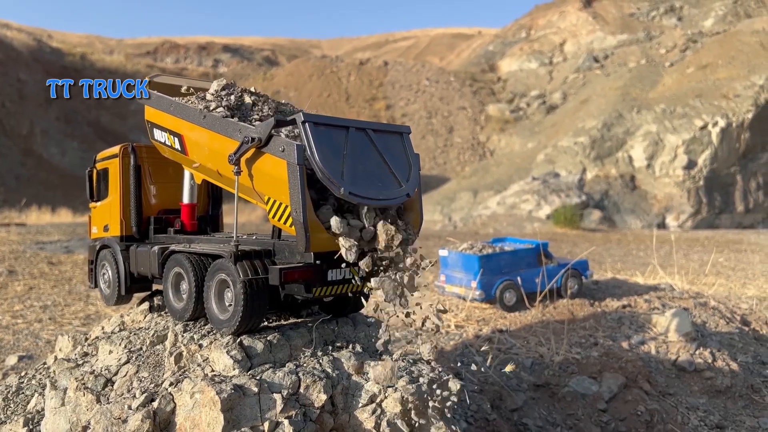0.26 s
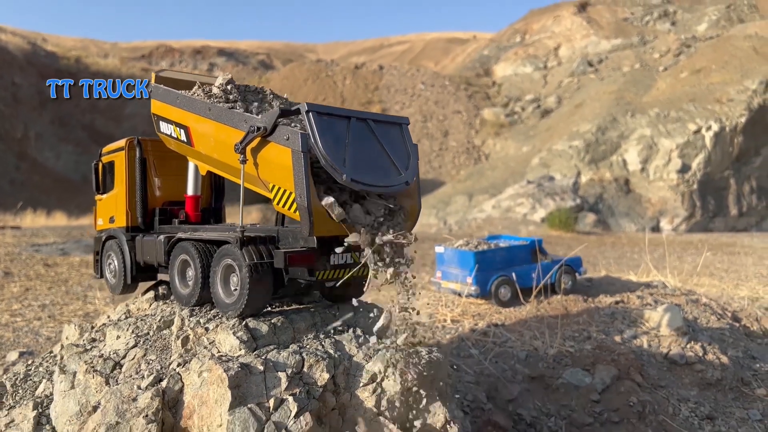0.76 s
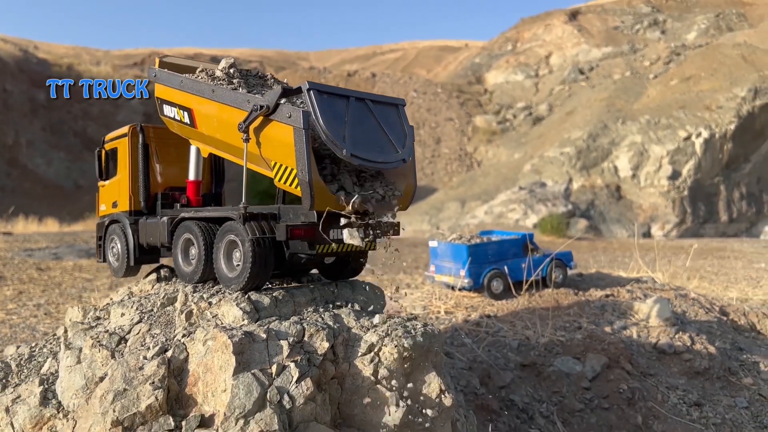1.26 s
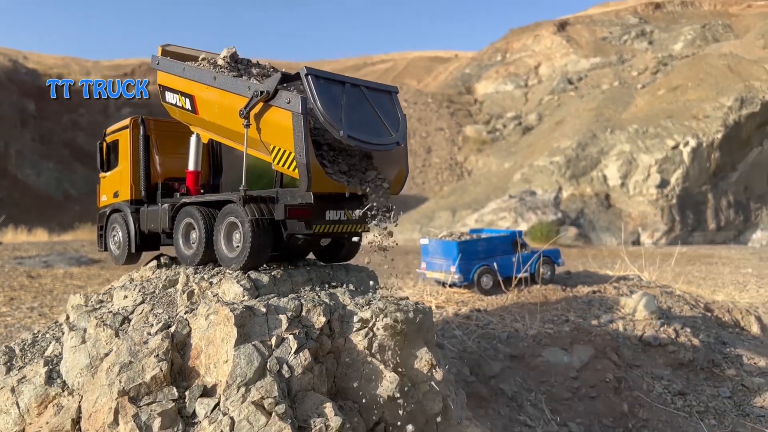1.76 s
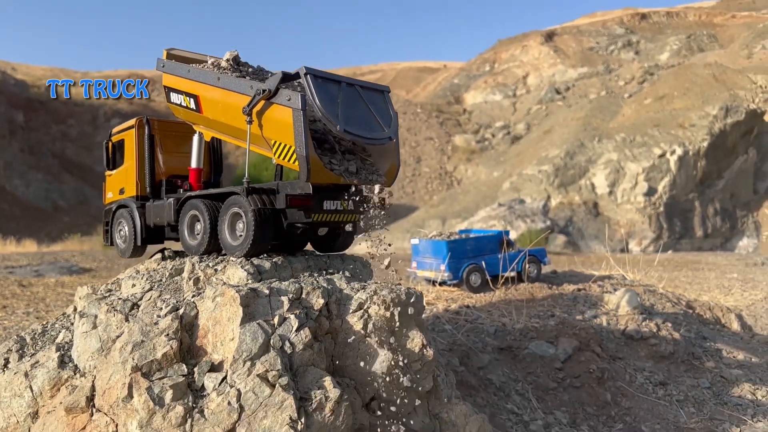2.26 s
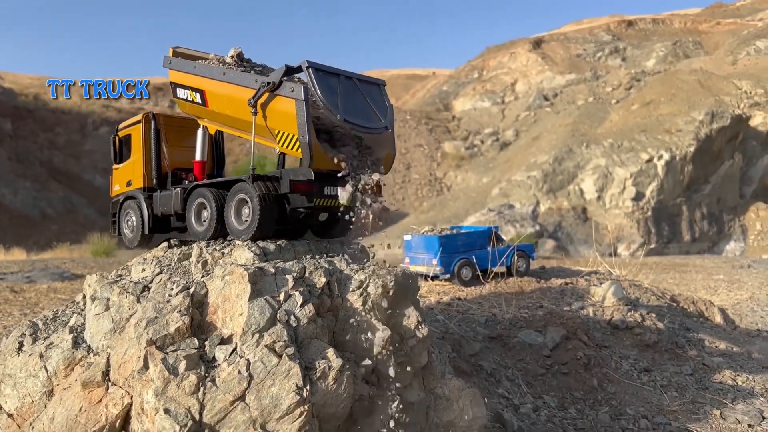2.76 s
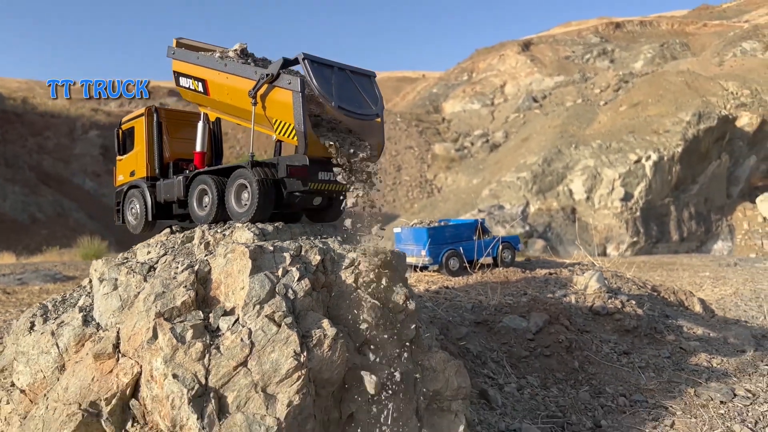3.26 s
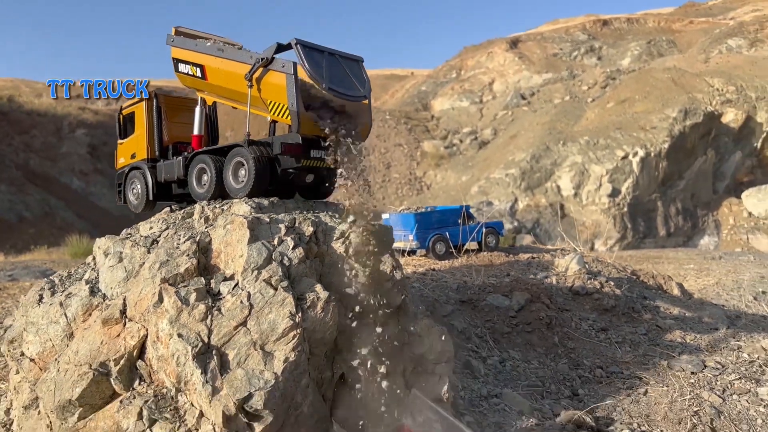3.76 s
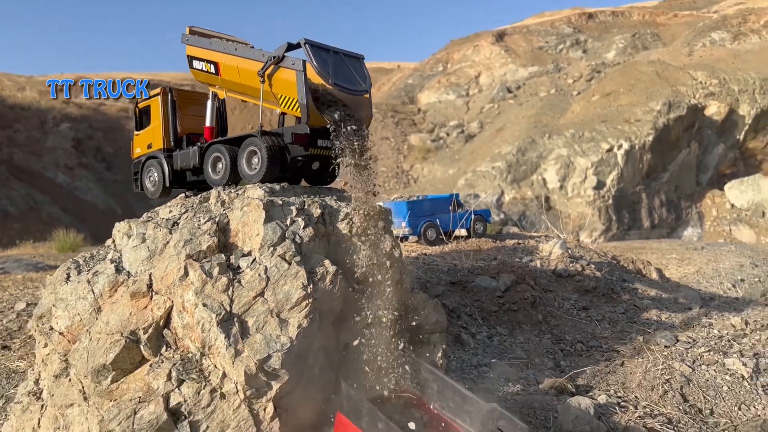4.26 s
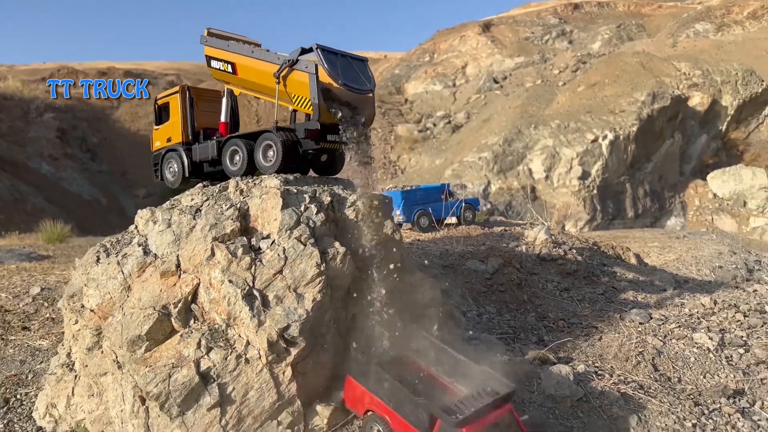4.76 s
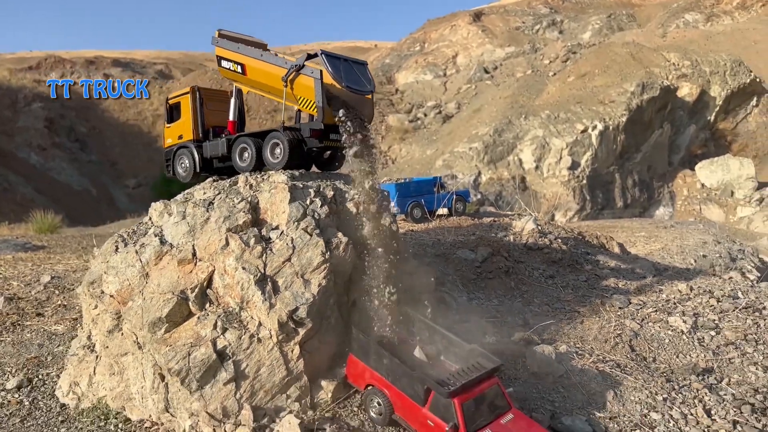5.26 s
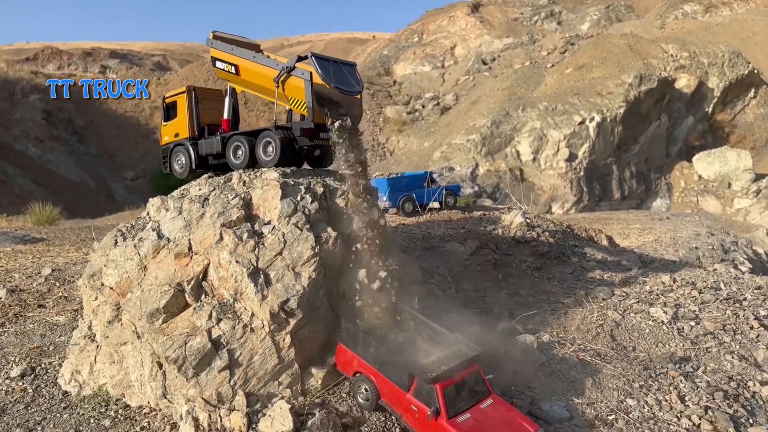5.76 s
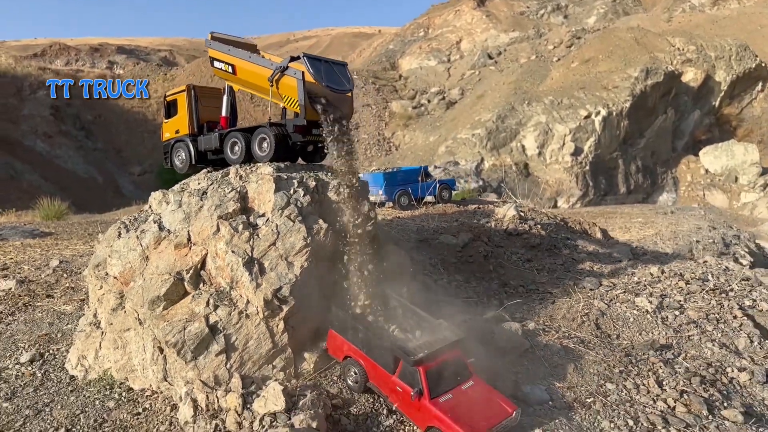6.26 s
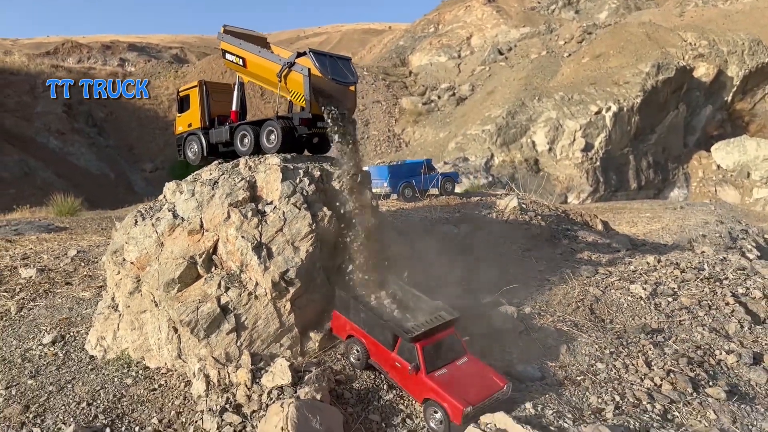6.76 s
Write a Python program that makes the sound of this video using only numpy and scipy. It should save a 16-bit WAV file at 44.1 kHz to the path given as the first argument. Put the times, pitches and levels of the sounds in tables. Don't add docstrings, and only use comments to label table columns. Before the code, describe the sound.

Outdoors in a dry quarry, two hard clacks open as stones leave a toy dump truck's plastic bed. A dense clattering rush of gravel follows for under a second, then thins to pebbles, chips and sandy hiss over hollow drumming. A loud double clack and a bright snap stand out midway before sparse ticks. Close stereo microphone backs away, with light wind buffets.

```python
import sys
import numpy as np
from scipy import signal
from scipy.fft import rfft, irfft, next_fast_len
from scipy.io import wavfile
from scipy.ndimage import uniform_filter1d

SR = 44100
rng = np.random.default_rng(int(sys.argv[2]) if len(sys.argv) > 2 else 0)


def gain_from_db(level_db):
    decades = np.asarray(level_db, float) / 20
    return 10 ** decades


def to_wav(sig):
    pcm = np.clip(np.atleast_2d(sig), -1, 1) * 32767
    pcm = np.round(pcm).astype(np.int16)
    wavfile.write(sys.argv[1], SR, pcm.T)


N = 309641
SIZE = next_fast_len(N + 8192)
HZ = np.maximum(np.fft.rfftfreq(SIZE, 1 / SR), 1)

# start_s, body_db, body_hz, edge_above_body_db, crack_above_body_db
LARGE_STONES = [(0.0092, -12, 1000, 4.5, 8.5), (0.0201, -8.5, 970.0, 2.5, -5), (0.1603, -10, 970.0, -3, 6),
                (0.1853, -12.5, 1010, -7, 11), (0.2391, -19, 576, 14.5, 14), (0.3993, -3, 870, -6.5, 0),
                (0.43, -26.5, 543, 21, 7), (0.9896, -15.5, 745, -8, 6), (0.9972, -10, 940, -6, 2.5),
                (1.0596, -16, 960, -16, 6.5), (1.1352, -15.5, 686, 0, 6), (1.1685, -15, 610, 9.5, 10),
                (1.283, -16.5, 900, -3, 7), (1.4293, -12.5, 645, -5, 9), (1.4786, -16, 864, 0.5, 1.5),
                (1.6402, -20.5, 834, -5, 8.5), (1.9048, -23, 1020, 2.5, 8.5), (2.6594, -20.5, 1005, 6, 5),
                (2.8535, -20, 960, 4.5, 2), (2.9744, -22, 920, 1, 5.5), (3.3298, -21, 1005, 10, 8.5),
                (3.532, -19.5, 896, -2, -12), (4.0991, -14.5, 710, -7, -3), (5.3503, -20, 690, -26, -8)]
# start_s, edge_db, body_above_edge_db,
# crack_above_edge_db
PEBBLES = [(0.038, -8, -4, 2), (0.079, -18, 9.5, 4.5), (0.098, -14, -3, -11), (0.11, -20, 8, -15),
           (0.1384, -16, 4, -12), (0.145, -13, 3, -6), (0.1784, -12.5, 5, 6.5), (0.1967, -14, 5, 2),
           (0.2546, -12.5, 13, 6.5), (0.2618, -5, 4, 0), (0.2798, -12, 1, -9), (0.2907, -19, 5, 16),
           (0.3086, -5, 1, -12), (0.3223, -20, -2, 11), (0.3557, -6.5, 5.5, 0), (0.369, -15, 15.5, 10),
           (0.4115, -12.5, -5, 7.5), (0.4833, -8, 11, 7), (0.4919, -6, -6, -7), (0.5172, -5, 4, -9),
           (0.5325, -9, 6, -2), (0.5486, -4, 3, 0), (0.5612, -14, 8.5, -16), (0.591, -5, -2, -11),
           (0.6087, -10.5, 6, 0), (0.6258, -8.5, -5, -4), (0.649, -12, -13, 6), (0.6864, -8.5, 3, 4),
           (0.7246, -7.5, -23, -5), (0.739, -9.5, -4, -5),
           (0.6776, -24, -1, 8), (0.7, -20, 7, 12.5), (0.7329, -15.5, 8, 6), (0.75, -20.5, -5, 11.5),
                  (0.8042, -26, -2, 17.5), (0.916, -16, 2, 4.5), (0.9542, -12, -5, -2),
                  (1.049, -16, -4, -0.5), (1.085, -15, 7.5, 6), (1.1228, -19, 3, 4), (1.1611, -17, 10, 4.5),
                  (1.2127, -17.5, -1, 2.5), (1.311, -17, 6, -3), (1.3553, -23.5, 7, 8.5),
                  (1.375, -14, 2, -6), (1.5285, -18.5, 3, 2), (1.6064, -24.5, 8, 6),
                  (1.7376, -20.5, 0, 3.5), (1.8023, -19, 8, -10), (1.917, -22, -3, 0),
                  (1.996, -30.5, -15, 8), (2.305, -20, 0, -8), (2.328, -29.5, -8, 9),
                  (2.3337, -17, 3.5, -7), (2.46, -23, -17, -6), (2.4753, -22, -1, 6.5),
                  (2.5942, -27.5, 15.5, -18), (2.644, -21, -8, 1), (2.6729, -33, -2, 16),
                  (2.7877, -21, 5.5, 3),
           (2.746, -28.5, 11, 8), (3.058, -28.5, -4, 7.5), (3.09, -24.5, 7, 1.5),
                   (3.167, -35, -7, 16.5), (3.2374, -33, -7, 11), (3.3943, -25.5, 9.5, 5.5),
                   (3.406, -18, 3, -2), (3.485, -23, -16, 1), (3.504, -22.5, -9, -4), (3.552, -25.5, 5, 4),
                   (3.6295, -20, -12, 2.5), (3.6643, -19.5, 9.5, 0), (3.678, -24.5, -9, 2.5),
                   (3.7275, -22, 0, -2), (3.7791, -18.5, -6, -3.5), (3.8655, -25, -10, -2),
                   (3.954, -28, -2, 3), (4.0386, -21.5, 3, 2.5), (4.0599, -24, 5, -1),
                   (4.08, -21.5, 7, -14), (4.169, -38, -12, 15.5), (4.1953, -28, 1, -7),
                   (4.2285, -29.5, -2, 8), (4.301, -32.5, 3, 10), (4.357, -29.5, -5, 6),
                   (4.445, -25, -8, -10), (4.582, -33.5, 11, 8.5), (4.6487, -28.5, 10.5, 3.5),
                   (4.692, -28.5, 9, 4), (4.7585, -25.5, 11.5, 1),
           (4.9438, -28, -3, -7), (5.052, -28.5, 14.5, 2), (5.1937, -39, 3.0, 12.5),
                (5.251, -36, 9, 13), (5.269, -32.5, 3, 10), (5.3439, -28, 16, 3), (5.4012, -28.5, 11, -1),
                (5.428, -30, 8, 10), (5.459, -36.5, 17, 10.5), (5.6995, -45, 24, 15.5), (5.73, -45, 15, 17),
                (5.8712, -43.5, -2, 12.5), (5.9602, -32.5, 14.5, -1), (6.1572, -34, 11, 5),
                (6.1834, -40.5, 16, 11), (6.246, -31.5, 15.5, 2), (6.292, -43, 17, 17.5),
                (6.398, -39, 21, 9.5), (6.6226, -40, 17, 8), (6.7317, -44.5, -3, 15),
                (6.997, -44, 13, 15.5)]
TAILGATE_HZ, ROCK_HZ, TAILGATE_UNTIL_S, EDGE_SPREAD = 2130, 1602, 1.25, 0.048
PITCH_SCATTER = 0.16


def falling():
    start_s, db, body_hz, edge_db, crack_db = np.transpose(LARGE_STONES)
    edge_hz = np.where(start_s < TAILGATE_UNTIL_S, TAILGATE_HZ, ROCK_HZ)
    edge_hz = edge_hz * (1 + EDGE_SPREAD * rng.standard_normal(len(start_s)))
    large = [start_s, db + 2, body_hz, db + edge_db + 3, edge_hz, db + crack_db - 3]

    pebbles = PEBBLES
    start_s, db, body_db, crack_db = np.transpose(pebbles)
    body_chance, edge_chance = rng.random((len(start_s), 2)).T
    body_hz = np.where(body_chance < 1 / 3, *bed_modes(start_s)) * pitch_scatter(body_chance)
    edge_hz = np.where(edge_chance < .5, ROCK_HZ, TAILGATE_HZ) * pitch_scatter(edge_chance)
    small = [start_s, db + body_db - 7, body_hz, db + 0.76, edge_hz, db + crack_db - 1.5]
    return stones(np.hstack([large, small]).T)


def pitch_scatter(chance):
    return 1 + PITCH_SCATTER * (chance % .5 - 1 / 4)


# pitch_hz, level_db
CLACK = [(250, -19), (420, -12), (600, 0.5), (1000, 5.5), (1300, -9.5), (1700, -2.5), (2150, -5.5),
         (2700, -10.5), (4000, -5.5), (5300, -19.5), (6400, -10.5), (8000, -13), (10000, -16), (15500, -24)]
LARGE_RING, LARGE_CLATTER = 0.88, .33
PARTNER_DB = -6.5
CONTACT = 3.22
SECOND_PATH = .35


def stones(rows):
    knocks, cracks = np.zeros((2, N + 2000)), np.zeros((2, N + 2000))
    t = np.arange(1500) / SR
    noises = rng.standard_normal((len(rows), 3, 2, 1500))
    band_limit = signal.butter(2, 800, fs=SR, output="sos")
    rough = rms_one(signal.sosfilt(band_limit, noises[:, :2])) * 0.43 * np.exp(-t / 0.0083)
    rough[:len(LARGE_STONES)] *= LARGE_CLATTER
    rings = np.where(np.arange(len(rows)) < len(LARGE_STONES), LARGE_RING, 1)
    paths = np.array([1, SECOND_PATH])
    for row, wobble, sharp, lasting in zip(rows, rough, noises[:, 2], rings):
        start_s, body_db, body_hz, edge_db, edge_hz, crack_db = row
        low_hz, high_hz = bed_modes(start_s)
        other_hz = high_hz if 2 * body_hz < low_hz + high_hz else low_hz
        ring = gain_from_db(body_db + 1.0) * struck(body_hz, t, 20.0 * lasting, 0.00048, 0.74 * wobble[0])
        ring += gain_from_db(body_db + PARTNER_DB) * struck(other_hz, t, 17.4 * lasting, 0.00063, 0.66 * wobble[0])
        ring += gain_from_db(edge_db + 0.5) * struck(edge_hz, t, 20.0 * lasting, 0.000066, wobble[1])
        crack = sharp * (np.exp(-t / 0.0004) + 0.3 * np.exp(-t / 0.0048))
        crack[:, 0] = CONTACT * paths
        at = round((start_s - .0002) * SR)
        knocks[:, at:at + 1500] += ring * paths[:, None]
        cracks[:, at:at + 1500] += gain_from_db(crack_db + 24.5) * crack / np.abs(crack[0]).max()
    bright = signal.butter(2, 2000, "high", fs=SR, output="sos")
    small = signal.butter(4, 470, "high", fs=SR, output="sos")
    crack_sound = signal.sosfilt(bright, colour(cracks[:, :N], CLACK))
    return signal.sosfilt(small, knocks[:, :N]) + crack_sound


def struck(hz, t, cycles, rise_s, wobble=0):
    fade = gain_from_db(-60 * t * hz / cycles) + wobble
    ring = np.sin(2 * np.pi * hz * t) * fade * (1 - np.exp(-t / rise_s))
    return ring / np.abs(ring).max()


LOW_MODE_HZ, HIGH_MODE_HZ = (602, 674), (983, 862)


def bed_modes(start_s):
    return [np.interp(start_s, [0, N / SR], ends) for ends in (LOW_MODE_HZ, HIGH_MODE_HZ)]


THICKENS = .35


def chatter(level_db, clumps):
    thick_db = THICKENS * np.maximum(level_db + 32, 0)
    impacts = grains(550 * gain_from_db(2 * clumps + thick_db), spread_db=4.2, burst_s=0.00095)
    near = rms_one(colour(impacts * gain_from_db(-thick_db / 2), CLACK))
    middle = signal.sosfilt(signal.butter(1, [1250, 1900], "band", fs=SR, output="sos"), near)
    distance = np.clip(0.38 * np.arange(N) / N, 0, 1)
    return gain_from_db(level_db + 4.0) * (near - distance * middle)


# start_s, treble_db, middle_above_treble_db
SPECKS = [(1.5306, -23.5, 4), (1.704, -27.5, -4), (1.796, -27, 0), (1.8184, -23, 5), (1.991, -29, 4),
          (2.054, -29.5, 12), (2.5429, -42, -3), (2.5728, -39, -12), (2.581, -30.5, 9), (2.6227, -41, 2),
          (2.6476, -31, -4), (2.778, -32, 2), (2.9256, -30, 2), (3.0494, -30, -8), (3.1252, -29, -12),
          (3.152, -28, -6), (3.454, -31, 8), (3.4674, -34, -4), (3.658, -27, 7), (3.8574, -34.5, 14),
          (3.935, -35, -4), (3.967, -32, -6), (4.0283, -29, 10), (4.149, -27, -1), (4.2016, -29, -5),
          (4.2548, -34, 5), (4.4026, -34, -8), (4.779, -40, -7), (4.822, -35, 8), (4.8727, -28, -6),
          (4.889, -33, 12), (4.9004, -37, -8), (5.056, -36.5, 15), (5.234, -31, -7), (5.3172, -34, 6),
          (5.332, -35, 12.5), (5.505, -34, -10), (5.707, -33, -13), (5.749, -38, -7), (5.773, -41, 3),
          (5.844, -35, -7), (6.1914, -39, -5), (6.4333, -34, -7), (6.461, -38, -4), (6.619, -40, 6),
          (6.665, -40, -5), (6.7943, -39, -7), (6.8656, -42, -6), (6.8752, -38, -15), (6.883, -33.5, -1),
          (6.929, -42, -4), (6.955, -38, -3)]
# start_s, middle_db,
# body_above_middle_db
CHIPS = [(0.051, -17, 1), (0.0672, -25, 7), (0.1037, -21, -10), (0.153, -13, -3), (0.2502, -11, 2),
         (0.28, -7, -12), (0.297, -21, -7), (0.302, -9, -3), (0.316, -9, 4), (0.3417, -8, 3),
         (0.3483, -12, -10), (0.417, -16, -11), (0.4545, -12, -10), (0.463, -10, -17), (0.5385, -6.5, -1),
         (0.567, -14, 1), (0.6072, -13, -2), (0.631, -12, -10), (0.6645, -13, -2), (0.778, -20, -18),
         (0.7861, -16, -6), (0.8118, -30, -9), (0.9013, -22, -4), (0.9113, -21, 8), (0.985, -8.5, -3),
         (1.012, -19, 1), (1.069, -16.5, 1), (1.0802, -16, -11), (1.096, -22, -1), (1.144, -30, 11),
         (1.207, -15, -7), (1.2967, -19.5, 7), (1.3226, -21, 6), (1.343, -18.5, -4), (1.386, -26, 8),
         (1.397, -21, -9), (1.4056, -21, -17), (1.4165, -23, -8), (1.442, -21, -3), (1.4973, -30, -12),
         (1.552, -21, 1), (1.6198, -19, 1), (1.7519, -23.5, 2), (1.8446, -28, -8), (1.9847, -37, -11),
              (2.216, -31, -9), (2.397, -22, -7), (2.407, -37, -3), (2.504, -28.5, -3), (2.544, -29, 0),
              (2.631, -24, -11), (2.7787, -29, -12), (2.869, -21.5, 7), (2.9535, -23.5, 2),
              (3.535, -24, -1), (3.861, -22, -9), (3.876, -30, -10), (3.884, -30, -8), (4.203, -32, -12),
              (4.212, -26, 1), (4.258, -25, 2), (4.4066, -32, -1), (4.6584, -26, -11), (4.712, -24.5, -5),
              (4.8261, -28.5, 4.5), (4.927, -37, 8.5), (5.111, -30.5, 7.5), (5.2633, -32, 9),
              (5.5067, -33, 3), (5.8046, -33, 2), (5.9137, -33, -1), (5.992, -33, 6), (6.4344, -29, -7),
              (6.555, -34, 1), (6.929, -33, 6), (6.956, -37, 9)]
# start_s, peak_db, pitch_hz, ring_cycles
SNAPS = [
    (1.429, -3.5, 1820, 5.2),
    (3.3296, 2, 1520, 7),
    (3.3314, -0.5, 1520, 5.8),
    (4.0989, -4.5, 3080, 7.2),
    (4.1018, -10, 1760, 18),
]
LOW_BODY_HZ, BODY_HZ, MIDDLE_HZ, TREBLE_HZ = (520, 690), (860, 1090), (1300, 4800), (5500, 15500)


def grit():
    start_s, db, middle_db = np.transpose(SPECKS)
    out = bursts(start_s, db + 3.0, TREBLE_HZ, 0.0012)
    out += bursts(start_s, db + middle_db - 1.5, MIDDLE_HZ, 0.00047)
    start_s, db, body_db = np.transpose(CHIPS)
    out += bursts(start_s, db - 5.0, MIDDLE_HZ, 0.0031)
    out += bursts(start_s, db + body_db - 6.0, BODY_HZ, 0.0024)
    out += bursts(start_s, db + body_db - 13.0, LOW_BODY_HZ, 0.0049)
    t = np.arange(400) / SR
    for start_s, db, hz, cycles in SNAPS:
        at = round(start_s * SR)
        out[0, at:at + 400] -= gain_from_db(db) * struck(hz, t, cycles, 0.26 / hz)
    return signal.sosfilt(signal.butter(4, 440, "high", fs=SR, output="sos"), out)


def bursts(start_s, db, band_hz, burst_s):
    clicks = np.zeros(N)
    clicks[(start_s * SR).astype(int)] = gain_from_db(db)
    shape = signal.lfilter([1], [1, -np.exp(-1 / (burst_s * SR))], clicks + 1e-18)
    band = signal.butter(2, band_hz, "band", fs=SR, output="sos")
    noise = signal.sosfilt(band, shape * rng.standard_normal((2, N)))
    return noise * np.sqrt(SR / 2 / np.ptp(band_hz))


# pitch_hz, level_db
SAND = [(1500, 6), (2000, 6), (4200, 4), (4900, -7.5), (6200, 4), (8000, -2), (10000, 1.5), (12000, 2),
        (15500, 2)]


def sand(level_db, clumps):
    fine = grains(3000 * gain_from_db(2.4 * clumps + 1.6 * drift(44)), spread_db=6.0, burst_s=0.00073)
    band_limit = [(300, -69)]
    return gain_from_db(level_db + 5.5) * rms_one(colour(fine, band_limit + SAND))


# pitch_hz, width_hz, level_db, change_as_bed_fills_db
HOLLOW = [
    (467, 4.7, -15.5, -1),
    (602.3, 35, 3, -3),
    (674, 31, 2.5, 0.5),
    (775, 128, -6.5, 5),
    (859, 35, -0.5, 5),
    (970, 61, -3.5, -2),
]


def hollow(level_db):
    rain = grains(2500 * gain_from_db(drift(20)), spread_db=2.5, burst_s=.0004)
    filled = np.arange(N) / N
    out = 0
    for k, (hz, width_hz, db, fills_db) in enumerate(HOLLOW):
        r = np.exp(-np.pi * width_hz / SR)
        b = (1 - r * r) / 2 * np.array([1, 0, -1])
        a = [1, -2 * r * np.cos(2 * np.pi * hz / SR), r * r]
        sign = (-1) ** k
        out = out + sign * gain_from_db(db + fills_db * filled) * signal.lfilter(b, a, rain)
    steep = signal.butter(2, [430, 1150], "band", fs=SR, output="sos")
    return gain_from_db(level_db - 2.5) * rms_one(signal.sosfilt(steep, out))


def grains(per_s, spread_db, burst_s):
    sizes = gain_from_db(spread_db * np.minimum(rng.exponential(1, N), 3.5))
    born = rng.random(N) < per_s / SR
    power = signal.lfilter([1], [1, -np.exp(-1 / (burst_s * SR))], sizes ** 2 * born + 1e-18)
    return np.sqrt(power) * rng.standard_normal((2, N))


# start_s, peak_db, pitch_hz
THUDS = [
    (1.482, -33.5, 392),
    (3.3285, -30, 413),
    (4.098, -27.5, 390),
    (4.585, -34, 425.5),
    (5.05, -48, 326),
    (5.343, -30, 406),
    (5.822, -46, 253),
    (6.174, -42, 340),
    (6.379, -38, 370),
    (6.485, -44, 440),
]


def thuds():
    out = np.zeros((2, N + 3000))
    t = np.arange(3000) / SR
    for start_s, db, hz in THUDS:
        at = round((start_s + 0.00091) * SR)
        out[0, at:at + 3000] += gain_from_db(db + 2.0) * struck(hz, t, 8.2, 0.0025)
    return out[:, :N]


# pitch_hz, level_db
BREEZE = [(15, -58), (25, -8), (67, 5.5), (118, 1), (178, -7), (237, -14), (340, -21), (400, -30),
          (520, -30), (880, -120)]
# start_s, peak_db
LUMPS = [(1.7136, -40), (1.909, -43), (2.005, -39), (2.614, -35), (3.455, -42), (3.6084, -45),
         (3.6786, -41), (4.1238, -42), (4.2, -37), (4.5356, -41), (4.8427, -45), (5.0501, -47),
         (6.6405, -41), (6.7717, -40)]
# time_s, level_db
HUM = [
    (4.7, -75),
    (5.1, -83),
    (6.3, -58),
    (6.7, -80),
]
HUM_HZ = 112


def wind():
    rumble = rms_one(colour(rng.standard_normal((2, N)), BREEZE))
    out = gusts() * gain_from_db(4.2 * drift(2.4)) * rumble
    t = np.arange(3000) / SR
    for start_s, db, hz in PUFFS:
        sweep = 70 * t + (hz + 160) * 0.00564 * (1 - np.exp(-t / 0.0048))
        pop = np.sin(2 * np.pi * sweep) * np.exp(-t / 0.014) * (1 - np.exp(-t / 0.00061))
        at = round(start_s * SR)
        out[0, at:at + 3000] += gain_from_db(db) * pop
    for start_s, db in LUMPS:
        at = round(start_s * SR)
        out[0, at:at + 3000] += gain_from_db(db + 0.5) * struck(73, t, 2.6, 0.0045)
    hum_cycles = np.cumsum(HUM_HZ + 4 * drift(2.7)) / SR
    out[0] += gain_from_db(in_time(HUM)[0]) * np.sin(2 * np.pi * hum_cycles)
    return out


# time_s, level_db
WIND = [(0, -35.5), (.21, -48.5), (.4, -42), (.55, -49), (1.45, -69), (2.03, -50), (2.15, -47), (2.3, -67),
        (2.6, -48), (2.75, -60), (3.9, -67), (4.25, -57), (4.65, -46), (5.14, -63.5), (6.55, -57.5),
        (6.75, -56), (7.02, -53)]
# start_s, peak_db, pitch_hz
PUFFS = [(0.259, -34, 51.1), (0.324, -25, 140.4), (0.363, -27, 94.2), (0.463, -22, 101),
         (0.811, -27.5, 147), (0.954, -25, 101), (1.326, -34, 170), (1.785, -42, 75.4), (2.095, -38, 72.7),
         (2.145, -38, 120), (2.518, -38, 90)]
WAKE_DB, WAKE_LAG_S, WAKE_RISE_S, WAKE_FALL_S = -10.5, 0.016, 0.014, 0.01


def gusts():
    puffs = np.array(PUFFS)
    after = np.arange(N) / SR - puffs[:, :1] - WAKE_LAG_S
    flutter = np.exp(np.minimum(after / WAKE_RISE_S, -after / WAKE_FALL_S))
    return gain_from_db(in_time(WIND)[0]) + gain_from_db(puffs[:, 1] + WAKE_DB) @ flutter


# pitch_hz, lead_radians
LEAD = [(0, 0), (690, 0.5), (1810, -0.5), (3190, 1.5), (4310, 0.5), (4740, -0.1), (5600, 2.2), (6720, -0.3),
        (8100, -0.8), (9130, -2.6), (10700, -3.4), (12700, -6.0), (13800, -6.3), (16100, -9.0)]
# pitch_hz, left_minus_right_db
TILT = [(60, -3), (150, 3), (380, -0.5), (950, 4), (2380, 1), (5980, 5.5), (15000, -1)]
# pitch_hz, likeness_0_to_1
LIKENESS = [(60, .88), (500, .96), (2200, .96), (2800, .78), (4000, .87), (5000, .4), (6000, .4),
            (7200, .84), (10200, .94), (15500, .8)]


def ports(paths):
    shared, scattered = rfft(paths, SIZE)
    alike = np.clip(at_hz(LIKENESS), 0, 1)
    lead = np.interp(HZ, *np.transpose(LEAD))
    side = np.array([[1], [-1]])
    both = np.sqrt((1 + alike) / 2) * shared + side * np.sqrt((1 - alike) / 2) * scattered
    tilt = gain_from_db(side * at_hz(TILT) / 2)
    return irfft(both * tilt * np.exp(.5j * side * lead), SIZE)[:, :N]


def rms_one(x):
    return x / np.sqrt(np.mean(x ** 2) + 1e-20)


def in_time(rows):
    time_s, *columns = np.transpose(rows)
    return [np.interp(np.arange(N) / SR, time_s, column) for column in columns]


def at_hz(points):
    hz, value = np.transpose(points)
    return np.interp(np.log(HZ), np.log(hz), value)


def colour(x, points):
    cepstrum = irfft(np.log(gain_from_db(at_hz(points))), SIZE)
    cepstrum[1:SIZE // 2] *= 2
    cepstrum[SIZE // 2 + 1:] = 0
    return irfft(rfft(x, SIZE) * np.exp(rfft(cepstrum)), SIZE)[..., :N]


def drift(rate_hz):
    r = np.exp(-80 * np.pi * rate_hz / SR)
    noise = rng.standard_normal(N // 40 + 2002)
    slow = signal.lfilter([1], [1, -2 * r, r * r], noise)[2000:]
    return np.interp(np.arange(N) / 40, np.arange(len(slow)), rms_one(slow))


# time_s, chatter_db, fines_share_db
FLOW = [(0, -20, -34), (.05, -42, -29), (.13, -28.5, -30), (.225, -29.5, -6), (.27, -22, 7), (.42, -23, 1),
        (.74, -28, 6.5), (1.25, -34, 4.5), (1.5, -37.5, 3), (2.2, -42.5, 1.5), (2.85, -38.5, -1),
        (3.24, -42, 3), (3.62, -37.5, 1.5), (3.9, -41.5, 0.5), (4.8, -47.5, 5.5), (6.1, -51, -2),
        (6.45, -48.5, 2), (7.02, -53, -2)]
DRUM_DB, DRUM_FOLLOWS, SAND_DB, SAND_FOLLOWS = -36, 0.14, -46.5, 0.61
CLUMP_HZ, CLUMP_LONGEST_S = 28, .09
PAN_START_DB, PAN_END_DB = -1.4, 0.5


def scene():
    flow_db, fines_db = in_time(FLOW)
    swing_db = flow_db + 40
    clumps = drift(CLUMP_HZ)
    clumps = rms_one(clumps - uniform_filter1d(clumps, int(CLUMP_LONGEST_S * SR)))
    pan_db = np.linspace(PAN_START_DB, PAN_END_DB, N) / 2
    pan = gain_from_db([pan_db, -pan_db])
    loose = chatter(flow_db, clumps) + sand(SAND_DB + SAND_FOLLOWS * swing_db + fines_db, clumps)
    bed = ports(hollow(DRUM_DB + DRUM_FOLLOWS * swing_db)) * gain_from_db([[1.5], [-1.5]])
    pour = bed + ports(falling() + thuds() + loose) + ports(grit())
    return pour * pan + ports(wind())


def roll_off(x):
    return signal.sosfilt(signal.butter(12, 16510, fs=SR, output="sos"), x)


def record(dry):
    bass_cut = signal.sosfilt(signal.butter(2, 48, "high", fs=SR, output="sos"), dry)
    rounded = 1.05 * np.tanh(bass_cut / 1.05)
    mix = signal.sosfilt(signal.cheby2(16, 50, 16000, fs=SR, output="sos"), rounded)
    return roll_off(mix)


dry = scene()
out = record(dry)
to_wav(out)
```